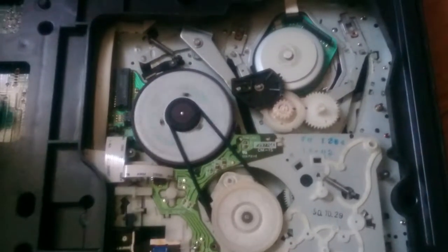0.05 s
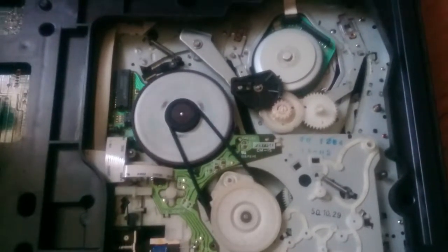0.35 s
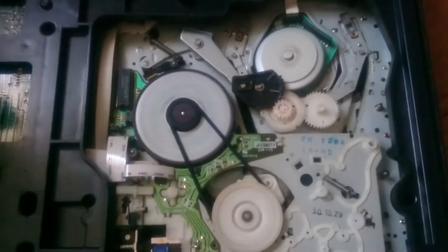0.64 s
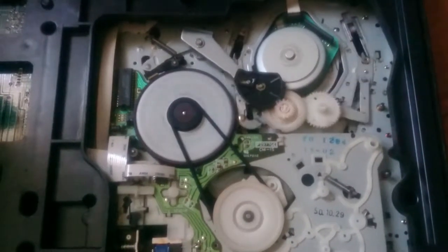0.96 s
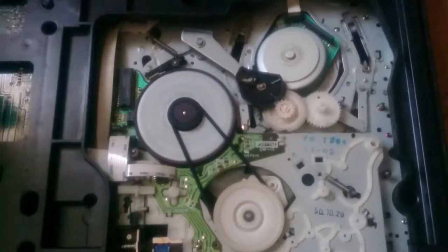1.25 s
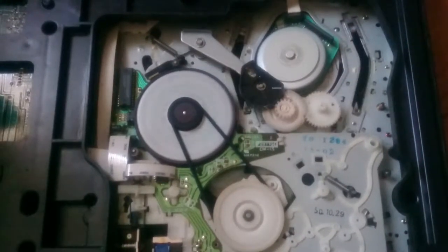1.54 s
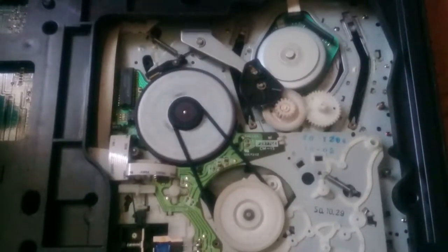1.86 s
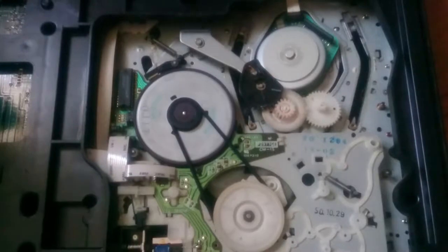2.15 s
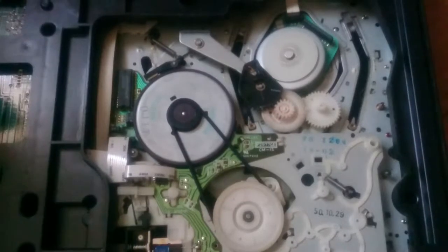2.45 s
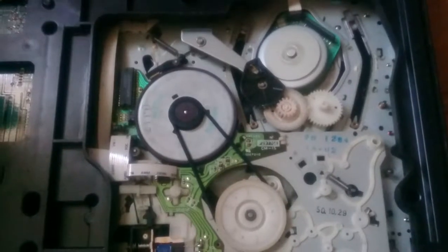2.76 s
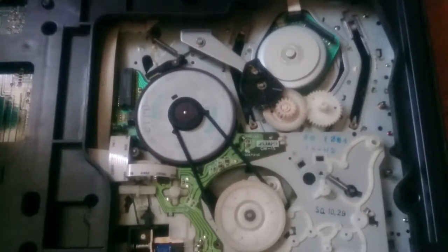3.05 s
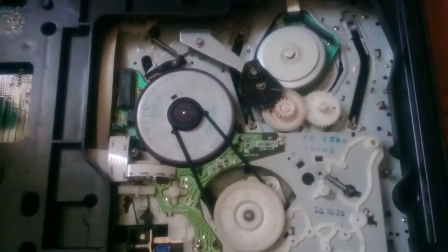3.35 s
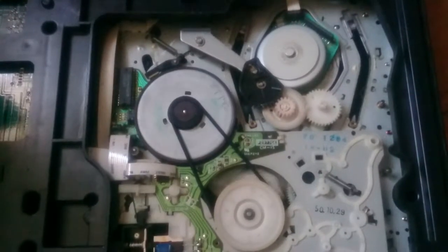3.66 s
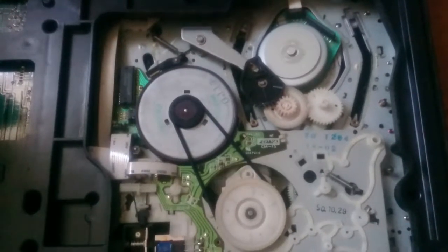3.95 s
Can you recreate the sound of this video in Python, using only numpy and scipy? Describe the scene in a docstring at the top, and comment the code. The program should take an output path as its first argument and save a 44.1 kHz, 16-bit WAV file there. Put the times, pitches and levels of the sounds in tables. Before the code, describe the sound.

A video cassette recorder mechanism whirs in runs from the start, close up, its plastic gears rattling over a faint hum. Levers clack sharply around 0.9, 1.4, 1.8 and 2.5 seconds, and guides slide with a thin hiss between 1 and 2 seconds. The motor stops at 3.3 seconds. Near 3.7 seconds the loudest latch snaps with a brief springy ring, followed by a few lighter clacks.

```python
"""A small room, a stereo pair of microphones close to the open deck of a video cassette recorder.
The deck changes mode: from the start a small motor whirrs in runs and drives plastic gears over the
faint hum of the head drum, while levers and latches clack against the steel chassis. From about 1 s
to 2 s guides slide along their tracks with a thin hiss. At 3.3 s motor and drum stop, and near 3.7 s
the loudest latch rings a spring, followed by a few lighter clacks."""
import sys
import numpy as np
from scipy import signal
from scipy.fft import rfft, irfft
from scipy.io import wavfile

SR = 44100
rng = np.random.default_rng(int(sys.argv[2]) if len(sys.argv) > 2 else 0)


def master(y):
    """Save y as 16-bit WAV."""
    cut = np.clip(np.atleast_2d(y).T, -1, 1)
    pcm = np.round(cut * 32767)  # scale
    wavfile.write(sys.argv[1], SR, pcm.astype(np.int16))


N = 176400
TIME = np.arange(N) / SR


def from_db(db):
    """Decibels to gain."""
    return 10 ** (np.asarray(db) / 20)


def unit_rms(x):
    """Scale to an rms of 1."""
    return x / np.sqrt(np.mean(x ** 2) + 1e-20)


def in_time(rows):
    """A (time_s, value) table as a curve at every sample."""
    return np.interp(TIME, *np.transpose(rows))


def at_hz(rows, hz):
    """The columns of a table at the given frequencies."""
    points, *columns = np.transpose(rows)
    return [np.interp(np.log(hz), np.log(points), column) for column in columns]


def drift(rate_hz):
    """A smooth random wander of rms 1, mostly slower than rate_hz."""
    hz = np.fft.rfftfreq(N, 1 / SR)
    return unit_rms(irfft(rfft(rng.standard_normal(N)) / (1 + (hz / rate_hz) ** 2), N))


def gate(start_s, end_s, ramp_s=0.037):
    """On between two times, with straight ramps."""
    return np.clip(np.minimum(TIME - start_s, end_s - TIME) / ramp_s + .5, 0, 1)


def pan(balance_db):
    """Left and right gains of constant total power."""
    gains = from_db(np.array([balance_db, -balance_db]) / 2).reshape(2, -1)
    return gains / np.sqrt(np.mean(gains ** 2, axis=0))


def noise(colour, stereo, resonances=(), band_hz=None):
    """Stereo noise of rms 1 with a colour and, if given, resonances and band edges."""
    hz = np.fft.rfftfreq(N, 1 / SR) + 1
    db, = at_hz(colour, hz)
    for centre_hz, width_hz, lift_db in resonances:
        db = db + lift_db / (1 + (2 * (hz - centre_hz) / width_hz) ** 2)
    gain = from_db(db)
    if band_hz:
        gain = gain / np.sqrt((1 + (band_hz[0] / hz) ** 10) * (1 + (hz / band_hz[1]) ** 10))
    balance_db, correlation = at_hz(stereo, hz)
    mid, side = rfft(rng.standard_normal((2, N)))
    pair = np.sqrt(1 + correlation) * mid + np.sqrt(1 - correlation) * side * [[1], [-1]]
    return unit_rms(irfft(gain * pan(balance_db) * pair, N))


# Spectrum of the quiet room: frequency_hz, relative_db
ROOM_COLOUR = [(20, 6.5), (50, -6), (90, -15.5), (200, -14.5), (600, -33.5), (1500, -16), (4000, -27),
               (8000, -31.5), (15000, -36.5)]
# The room at the two microphones: frequency_hz, left_over_right_db, correlation
ROOM_STEREO = [(30, 0.21, 0.083), (200, 2, 0.66), (2000, 0, 0), (12200, 1.1, 0.08)]


def room_tone(level_db=-72):
    """The low, steady hush of the room around the microphones."""
    return from_db(level_db) * noise(ROOM_COLOUR, ROOM_STEREO)


# The deck at the two close microphones: frequency_hz, left_over_right_db, correlation
DECK_STEREO = [(100, 10, 0.7), (300, 5.5, 0.77), (566, 5.5, 0.72), (1110, 10, 0.22), (1602, 12.5, 0.75),
               (1950, -6, 0), (3200, 3, 0.065), (6250, -3.5, 0), (8640, -1, 0.3), (12600, -7, 0)]


def partial(hz, phase, level_db, flutter_db=0.5, roughness_db=1.6):
    """One rough, fluttering partial from the deck, placed between the microphones by its pitch."""
    waver_db = flutter_db * drift(3) + roughness_db * drift(45)
    balance_db, _ = at_hz(DECK_STEREO, hz)
    return np.sqrt(2) * from_db(level_db + waver_db) * np.sin(phase) * pan(balance_db)


# Speed of the motor shaft: time_s, turns_per_s
MOTOR_SPEED = [(0, 56.6), (.35, 55), (.58, 55), (.7, 54.8), (1.2, 54), (1.7, 56.7), (2.1, 52.7),
               (2.35, 54.4), (2.75, 55), (2.9, 56), (3.25, 56.5)]
# Runs of the motor: start_s, end_s, [(multiple_of_speed, level_db)]
MOTOR_RUNS = [(0, 0.62, [(8, -78), (10, -78.5), (20, -64.5), (26, -72.5)]), (0.656, 0.872, [(10, -72.5),
              (11, -66), (21, -74.5)]), (1.06, 1.86, [(10, -71), (11, -66.5), (17, -71), (21, -64.5)]),
              (2.065, 2.748, [(10, -75), (11, -72.5), (17, -72), (21, -68.5), (27, -75.5)]),
              (2.803, 3.275, [(7, -71), (8, -68), (9, -77), (13, -72), (18, -68.5), (23, -71.5), (57, -81),
              (61, -80.5)])]


def motor(turns):
    """Each run whines on its own multiples of the shaft speed."""
    mean_speed = np.mean(in_time(MOTOR_SPEED))
    out = np.zeros((2, N))
    for start_s, end_s, partials in MOTOR_RUNS:
        for multiple, level_db in partials:
            whine = partial(multiple * mean_speed, 2 * np.pi * multiple * turns, level_db)
            out += gate(start_s, end_s) * whine
    return out


# Resonances of the steel chassis: centre_hz, width_hz, lift_db
CHASSIS = [(168.6, 16, 6), (308.3, 26, 11.5), (370.4, 17, 5.5), (452.4, 14.7, 9), (557, 33, 5.5),
           (607, 20, 12), (698, 110, 6), (784, 53, 3), (1100, 86, 4), (1240, 45, 2.5), (1393, 45, 4),
           (1565, 56, 2)]
# Load on the gear train, heard as its loudness: time_s, level_db
GEAR_LOAD = [(0, -60.5), (.16, -62.5), (.55, -61), (.8, -60.5), (.93, -47), (.98, -47), (1.08, -52),
             (1.14, -58.5), (1.3, -53.5), (1.4, -51.5), (1.53, -49.5), (1.57, -55.5), (1.76, -54.5),
             (1.88, -61.5), (1.96, -69), (2.005, -82), (2.025, -63), (2.38, -59.5), (2.48, -61),
             (2.66, -63.5), (2.72, -57.5), (2.79, -74.5), (2.822, -51), (2.88, -60.5), (3.02, -60.5),
             (3.2, -60.5), (3.245, -55.5), (3.29, -70.5), (3.45, -79.5), (3.64, -82), (3.69, -50.5),
             (3.9, -85.5), (4, -74)]
# Spectrum of the gears' low growl: frequency_hz, relative_db
GROWL_COLOUR = [(100, -37), (220, -12.5), (300, -3), (600, -3), (900, 1.5), (1150, -0.5), (1600, -2.5),
                (2000, -10.5), (3000, -24.5), (6000, -44)]
# Spectrum of the rasp of meshing teeth: frequency_hz, relative_db
RASP_COLOUR = [(1200, -20), (2000, -8.5), (2550, -0.5), (3050, 4), (3400, 0.5), (4000, -2.5), (4800, -17.5),
               (7500, -14), (11000, -27.5), (16000, -29)]
# Strength of that rasp against the load curve: time_s, relative_db, throb_depth_db
RASP_LEVELS = [(.4, -8, 2), (1, -10, 1.5), (1.7, -8.5, -4.5), (2.2, -9.5, 2.5), (2.7, -9, -0.5),
               (2.85, -12.5, -3.5), (2.97, -5.5, 3), (3.19, -8, 0.5), (3.27, -12, 3)]


def gears(turns, teeth_per_turn=3.55, wobbles_per_turn=1.2, throb_hz=11):
    """Tooth after tooth rubs and taps: a rattling growl and a throbbing rasp, both following the load."""
    teeth = unit_rms(1 + 0.16 * np.cos(2 * np.pi * teeth_per_turn * turns + drift(28)))
    wobble_phase = 2 * np.pi * wobbles_per_turn * turns
    wobble_db = 0.67 * (np.sin(wobble_phase) + np.sin(wobble_phase / 2))
    time_s, rasp_db, depth_db = np.transpose(RASP_LEVELS)
    throb_db = np.interp(TIME, time_s, depth_db) * np.sin(2 * np.pi * throb_hz * TIME + drift(6))
    growl = from_db(-0.5) * noise(GROWL_COLOUR, DECK_STEREO, CHASSIS)
    rasp = from_db(np.interp(TIME, time_s, rasp_db) + throb_db) * noise(RASP_COLOUR, DECK_STEREO)
    rattle_db = 1.5 * drift(37)
    return from_db(in_time(GEAR_LOAD) + wobble_db + rattle_db) * teeth * (growl + rasp)


# Hum of the spinning head drum: pitch_hz, level_db
DRUM_PARTIALS = [(297, -86), (598, -85), (1140, -78), (1233, -77.5)]


def head_drum(stop_s=3.3):
    """The drum, already spinning, hums on a few slightly wandering partials until it stops."""
    hum = sum(partial(hz, 2 * np.pi * hz * TIME + 2.3 * drift(2.4), db) for hz, db in DRUM_PARTIALS)
    return gate(-1, stop_s) * hum


# Levers and latches hitting the chassis, with a strength for each of five bands, low to high:
# start_s, thud_db, knock_db, clack_db, tick_db, sizzle_db, contact_s
BLOWS = [(.007, -52.5, -54.5, -68, -55.5, -58, .0005), (.063, -57.5, -54, -64.5, -69, -69, 0.00081),
         (0.077, -55.5, -53.5, -78, -65, -55, 0.00036), (.486, -62, -47.5, -50.5, -56, -55.5, .0007),
         (.596, -73, -65, -63, -76, -80, 0.0054), (0.8569, -45.5, -47, -42.5, -43, -45.5, 0.0001),
         (.873, -48, -47, -47, -58, -56, 0.0009), (.919, -50.5, -37.5, -34.5, -36, -43.5, 0.01),
         (.94, -52, -43, -42, -35, -46, 0.0028), (0.972, -61, -43.5, -62, -56, -56, .0014),
         (1.034, -58, -49, -83, -79, -72, .003), (1.349, -59, -43.5, -41.5, -42, -44, .0032),
         (1.364, -40, -32, -35.5, -40, -44, 0.0021), (1.418, -47, -45, -44, -42, -46.5, 0.0029),
         (1.594, -70, -55, -74, -74, -57, 0.0057), (1.7997, -46, -41, -40, -34, -54, .0015),
         (2.015, -74, -63, -87, -91, -90, .001), (2.379, -63, -65, -66.5, -90, -85, 0.0015),
         (2.426, -48, -46.5, -40, -48, -45, 0.0013), (2.455, -62.5, -48, -55, -48.5, -49.5, 0.00095),
         (2.467, -61, -58, -65, -54.5, -53, .0007), (2.532, -46.5, -41, -41, -43, -50.5, 0.0011),
         (2.553, -47.5, -41, -54, -59, -64, 0.00082), (2.5636, -53.5, -45.5, -46, -37, -34, 0.00017),
         (2.5685, -51, -49, -44.5, -38, -39, 0.00026), (2.952, -55, -53, -59, -90, -85, 0.0034),
         (3.01, -60.5, -51.5, -63.5, -93, -89.5, .004), (3.487, -61.5, -64, -75, -95, -96, 0.011),
         (3.516, -75, -67.5, -74.5, -93, -97, 0.014), (3.6749, -39.5, -32.5, -32.5, -29, -27.5, 0.0007),
         (3.679, -39.5, -33.5, -26.5, -26.5, -24, 0.0012), (3.765, -48, -37.5, -39.5, -39, -34, 0.00025),
         (3.81, -55, -69, -51, -49.5, -50, 0.0004), (3.8165, -52.5, -50, -51, -64, -66, 0.00055),
         (3.8857, -58.5, -52.5, -59.5, -68, -64.5, 0.00088)]
# Borders of those bands: edge_hz
BLOW_EDGES_HZ = [170, 700, 2000, 5500, 10000, 17000]
# How each band starts and dies: delay_s, t60_s, tail_relative_db, tail_t60_s
BLOW_DECAYS = [(0.0017, 0.21, -13.5, .5), (0.0016, 0.12, -10.5, 0.25), (0.000082, 0.069, -10, 0.22),
               (0.000041, 0.048, -15, 0.19), (.0001, 0.035, -11.5, 0.17)]
# Spectrum that shapes each band: frequency_hz, relative_db
BLOW_COLOUR = [(170, -8.5), (235, -20), (290, -4), (400, -2), (700, -4.5), (900, -2), (1400, 4.5),
               (1900, -5), (2500, -6), (4500, -7), (7000, -9.5), (10000, -15), (13500, -15.5),
               (16000, -24.5)]


def lever_blows(trim_db=-1, crack_t60_s=.009, low_cut_hz=168):
    """Each blow excites the dense chassis modes: a crack, a chattering decay, a tail in case and room."""
    out = np.zeros((2, N))
    chatter = from_db(drift(120))
    for band, (delay_s, t60_s, tail_db, tail_t60_s) in enumerate(BLOW_DECAYS):
        direct_power, tail_power = np.zeros((2, N))
        for start_s, *levels_db, contact_s in BLOWS:
            first = int((start_s + delay_s) * SR)
            age = TIME[:min(SR, N - first)]
            span = slice(first, first + len(age))
            strength = from_db(levels_db[band] + trim_db) * np.minimum(age / (contact_s + delay_s), 1)
            crack_db = 9 - 20 * np.log10(1 + contact_s / 0.0001)  # longer contacts crack more softly
            since_contact = np.maximum(age - contact_s, 0)
            crack = from_db(crack_db - 60 * since_contact / crack_t60_s)
            body = from_db(-60 * since_contact / t60_s)
            tail = from_db(tail_db - 60 * since_contact / tail_t60_s)
            direct_power[span] += (strength * (body + crack)) ** 2
            tail_power[span] += (strength * tail) ** 2
        envelope = np.sqrt(direct_power * chatter ** 2 + tail_power)
        out += envelope * noise(BLOW_COLOUR, DECK_STEREO, CHASSIS, BLOW_EDGES_HZ[band:band + 2])
    return signal.sosfilt(signal.butter(4, low_cut_hz, "high", fs=SR, output="sos"), out)


# Modes of each part that rings when struck: pitch_hz, relative_db, t60_s
PEG = [(10960, 0, 0.016)]
DETENT = [(366, -1.5, .13), (1090, 0, 0.058), (1490, -3, 0.059), (3850, -3.5, .09)]
LEVER = [(457, 2.5, 0.096), (604, 2, 0.11), (1147, 1, 0.11), (3010, 1.5, 0.062), (6240, -2, 0.092),
         (6450, -9, .1), (13400, -9, 0.088)]
END_STOP = [(799, -3, 0.083), (1090, 12.5, 0.021), (1120, -4, 0.055), (1193, 2, 0.075)]
CATCH = [(4560, 2.7, 0.015)]
CASE = [(279.5, 0, 0.092), (316, -4, 0.079)]
SPRING_LATCH = [(299, -3, .09), (317, 0, 0.13), (1240, -3, .13), (1636, -1, 0.056), (5518, -4.5, .13),
                (5630, -10, 0.13), (5850, -7, 0.13), (5849, -3.5, 0.14), (5995, -4.5, 0.2), (6100, -6, .14),
                (9630, -7, .035), (11040, -3.5, 0.13)]
# Strikes on those parts: start_s, level_db, modes
PART_STRIKES = [(0.077, -48, PEG), (.488, -51.5, DETENT), (.859, -39, LEVER), (1.369, -30.5, END_STOP),
                (1.802, -37, CATCH), (1.906, -53, CASE), (2.428, -41, CATCH), (2.432, -50, CASE),
                (3.6803, -29.5, SPRING_LATCH)]


def ringing_parts(buzz_radians=0.96, buzz_db=3.5, buzz_rate_hz=340):
    """Struck parts ring on and buzz in their loose seats: high modes waver most in pitch and level."""
    out = np.zeros((2, N))
    for start_s, level_db, modes in PART_STRIKES:
        first = int(start_s * SR)
        age = TIME[:min(SR // 2, N - first)]
        for hz, mode_db, t60_s in modes:
            balance_db, correlation = at_hz(DECK_STEREO, hz)
            offset_cycles = rng.random() + (1 - correlation) * rng.random((2, 1)) / 2
            bend, swell = min(hz / 5000, 1) * drift(buzz_rate_hz)[:2 * len(age)].reshape(2, -1)
            wave = np.sin(2 * np.pi * (hz * age + offset_cycles) + buzz_radians * bend)
            attack = np.minimum(age * hz / 2, 1)  # two cycles long
            envelope = attack * from_db(level_db + mode_db + buzz_db * swell - 60 * age / t60_s)
            out[:, first:first + len(age)] += envelope * wave * pan(balance_db)
    return out


# Slides of the guides along their tracks: middle_s, length_s, level_db
SLIDES = [(1.014, 0.12, -63), (1.223, 0.14, -63.5), (1.426, 0.15, -60.5), (1.64, 0.15, -64.5),
          (1.832, 0.13, -64)]
# Spectrum of their friction: frequency_hz, relative_db
SLIDE_COLOUR = [(2000, -1), (4000, 5), (5500, -12), (8000, 0.5), (10500, 2), (11800, 6.5), (12500, 12.5),
                (13400, 0.5), (16000, -20)]


def guides(waver_db=1.5, grain_db=2.5):
    """Sliding guides rub out separate swells of thin, grainy hiss, about five a second."""
    swells = np.zeros(N)
    for middle_s, length_s, level_db in SLIDES:
        from_middle = np.abs(2 * (TIME - middle_s) / length_s)
        swells += from_db(level_db) * 0.5 ** (from_middle ** 3)
    unevenness = from_db(-waver_db * drift(10) + grain_db * drift(200))
    return swells * unevenness * noise(SLIDE_COLOUR, DECK_STEREO)


def scene():
    """The deck close up over the quiet of the room; motor and gears follow the same turning shaft."""
    speed = in_time(MOTOR_SPEED) * (1 + 0.0019 * drift(11.5))
    turns = np.cumsum(speed) / SR
    return (room_tone() + motor(turns) + gears(turns) + head_drum()
            + lever_blows() + ringing_parts() + guides())


def record(dry, cutoff_hz=15900):
    """Both microphone channels pass through a steep cut of the highest treble."""
    return signal.sosfilt(signal.ellip(10, .2, 80, cutoff_hz, fs=SR, output="sos"), dry)


dry = scene()
out = record(dry)
master(out)
```